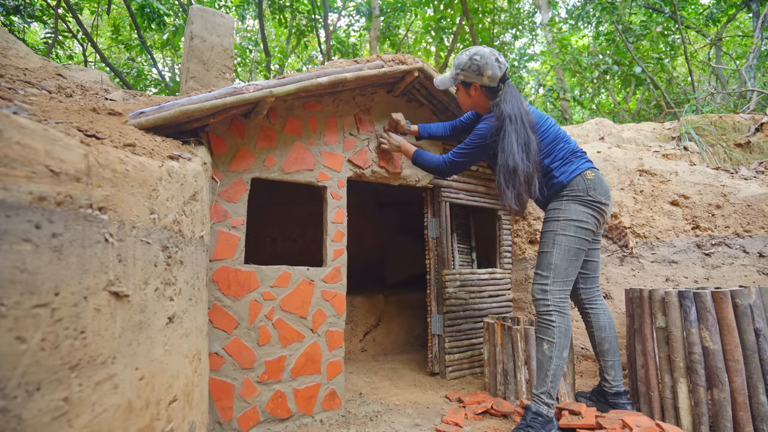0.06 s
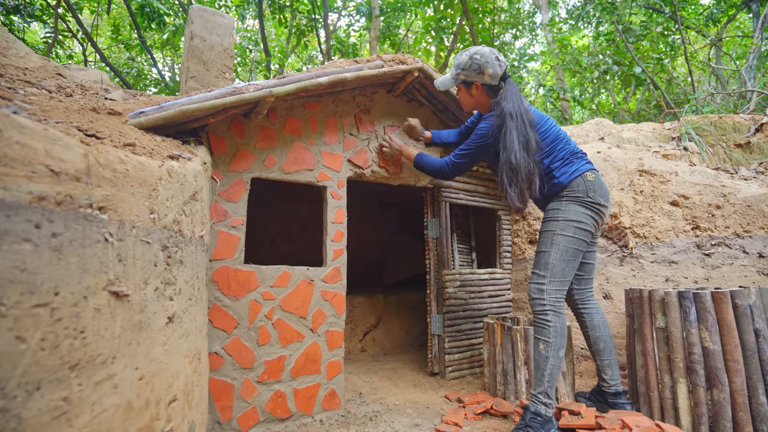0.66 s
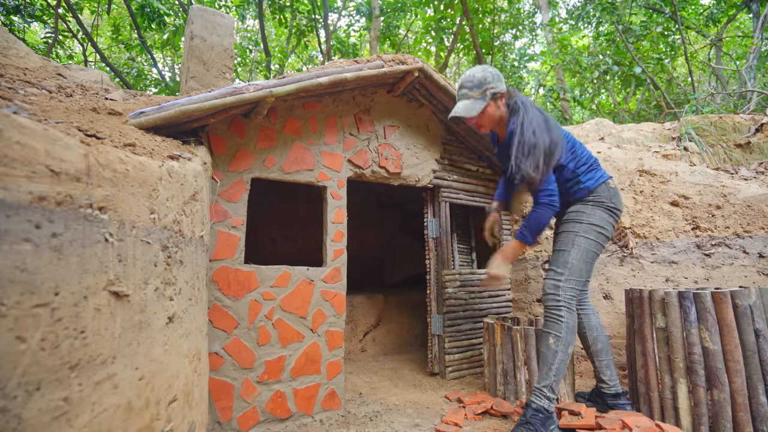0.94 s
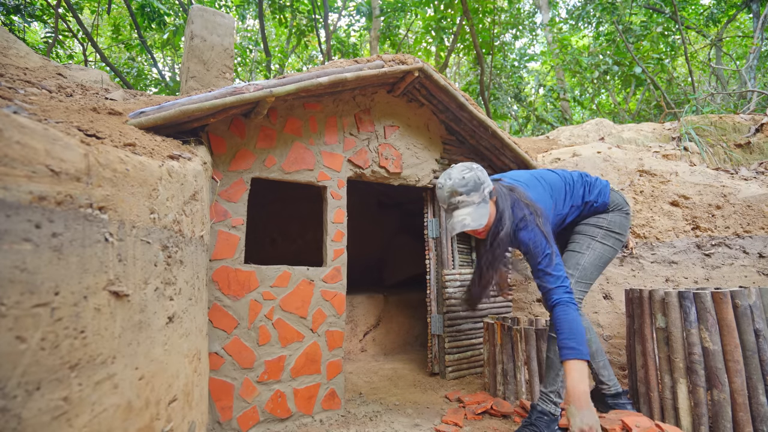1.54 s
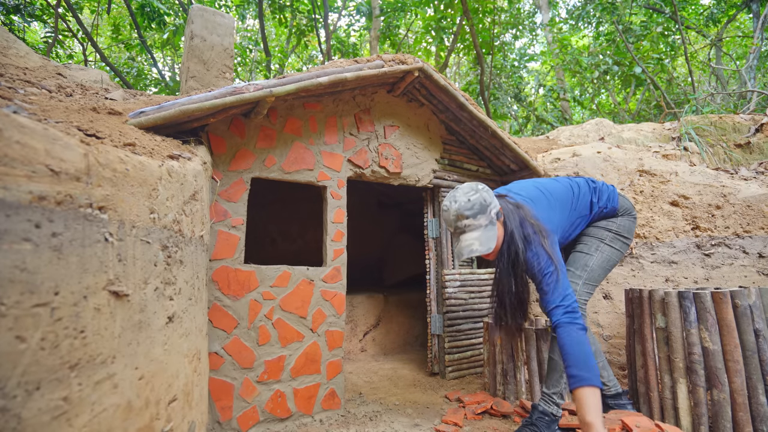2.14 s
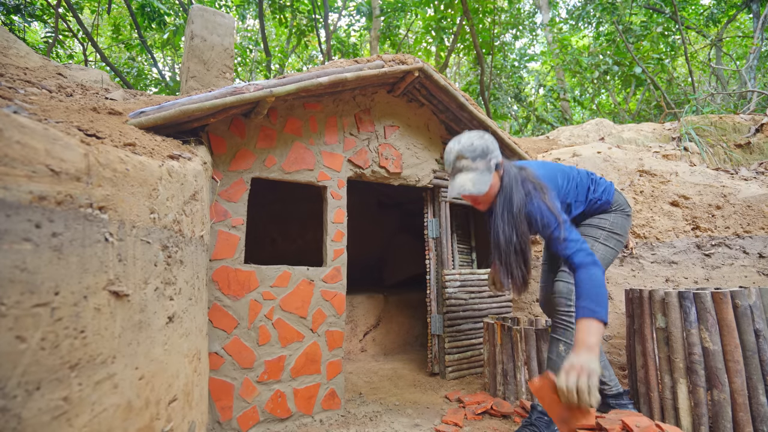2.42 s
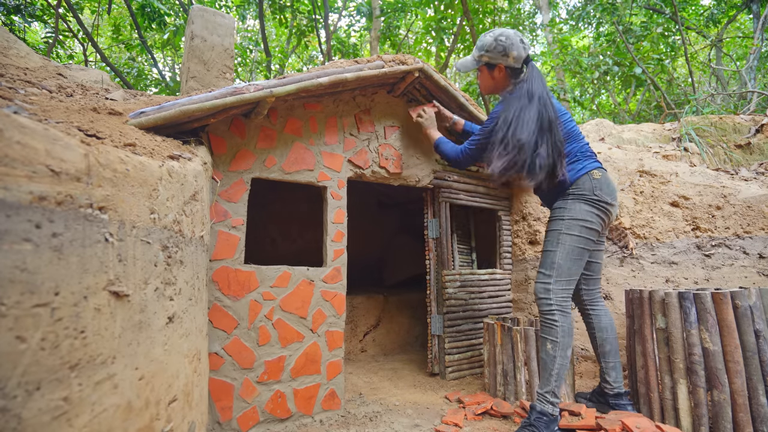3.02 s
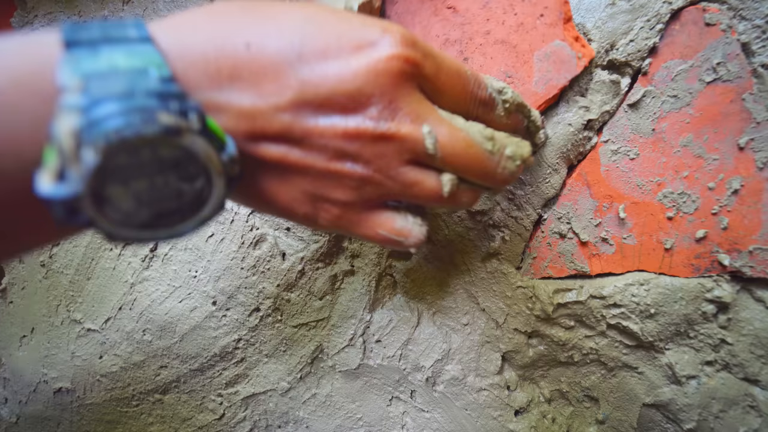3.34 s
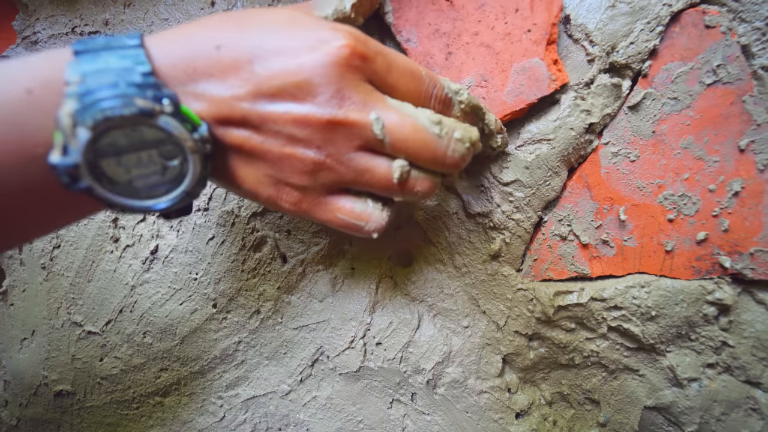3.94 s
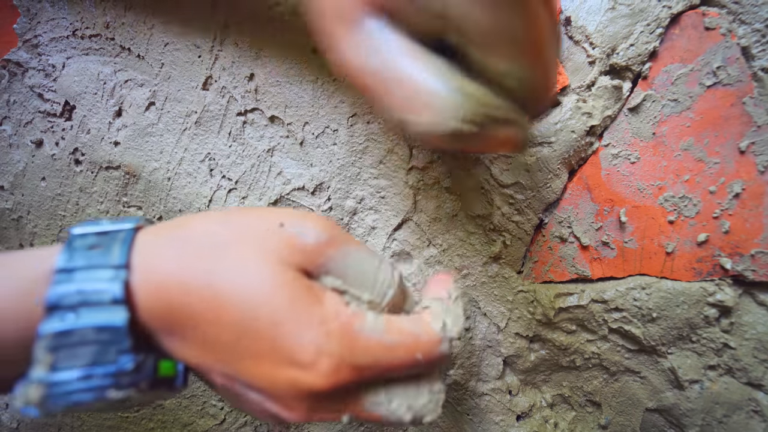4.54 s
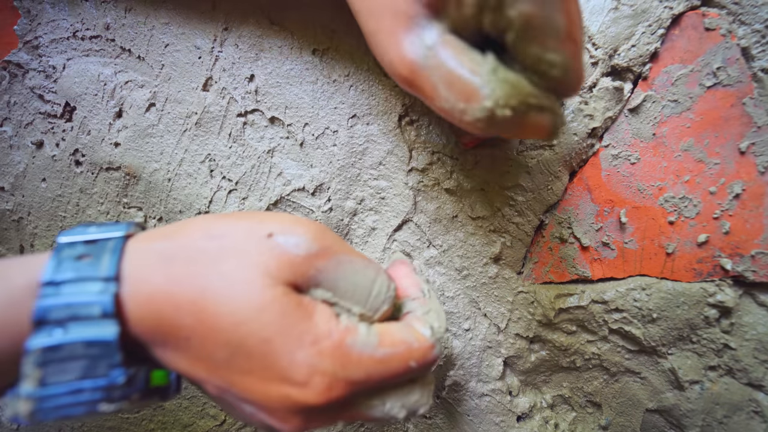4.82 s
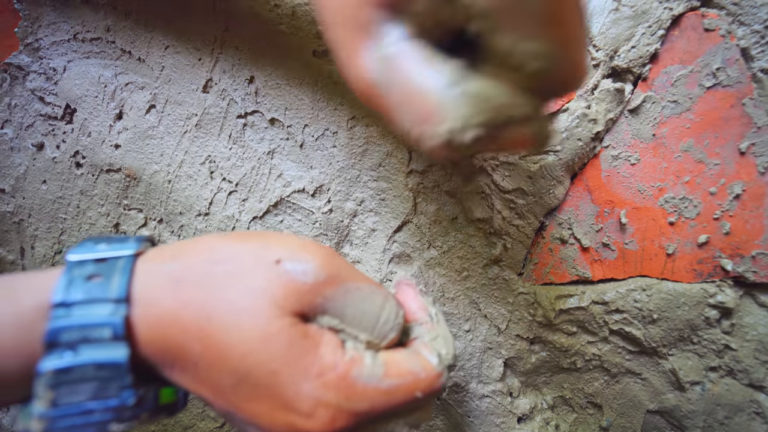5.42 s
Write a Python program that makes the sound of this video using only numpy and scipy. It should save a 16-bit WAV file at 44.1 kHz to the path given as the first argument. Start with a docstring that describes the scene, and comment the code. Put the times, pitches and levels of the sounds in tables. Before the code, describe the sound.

A high cicada drone runs throughout, over a faint hiss of forest leaves. From the start until about 1.3 seconds, tile shards are lightly tapped and rubbed into plaster a few steps away, while birds give short whistles among the trees. From 1.4 seconds a hand rakes through a pile of shards, which grind and clack, growing loudest around 2.5 seconds, when one piece rings briefly as it comes free. Thin birdsong and dry chatter follow, with one faint tap and a rub near 3.1 seconds. At 3.4 seconds the sound moves right up to the wall: the birds stop, the cicadas buzz more strongly, and fingers work wet mud with soft crackles and small pops. From 4.6 to about 5.5 seconds a fist pounds the mud six times, quickly and evenly, each blow a low thump with a sticky slap.

```python
"""Someone tiles a mud hut in a forest, where cicadas drone throughout over faint leaves.
First, while birds whistle among the trees, shards are tapped and rubbed into the plaster.
From 1.4 s a hand rakes a pile: shards grind and clack, and one rings as it comes free.
From 3.4 s, heard close by and without the birds, fingers work the crackling wet mud.
From 4.6 s a fist pounds it six times, each blow exciting the low modes of the wall."""
import sys
import numpy as np
from scipy import signal
from scipy.fft import rfft, irfft, next_fast_len
from scipy.io import wavfile
from scipy.ndimage import map_coordinates

SR = 44100
rng = np.random.default_rng(int(sys.argv[2]) if len(sys.argv) > 2 else 0)


def digitize_waveform(pressure):
    """Quantize a signal to 16-bit integers and store it at the path in sys.argv[1].

    Rows of a 2-D input are taken as channels; values are limited to [-1, 1].
    """
    field = np.atleast_2d(pressure).T
    bounded = np.clip(field, -1, 1)
    quanta = np.round(bounded * 32767).astype(np.int16)
    wavfile.write(sys.argv[1], SR, quanta)


N = 245624
T = np.arange(N) / SR
BRIEF = np.arange(SR // 4) / SR  # time axis of one short event
CLOSE_S = 3.408  # from here on the listener is right at the wall
LIFT_S = 2.4  # the piece leaves the ground, so later knocks thud less

# Spectra. Each row: frequency in Hz, relative spectral density in dB.
LEAF_SPECTRUM = [(40, 2), (105, -1.5), (150, 4), (220, 0), (450, 2), (1100, -4.5), (2200, -7), (4000, -8),
                 (4700, -3), (5400, -16.5), (9000, -12.5), (15500, -9)]
CHORUS_SPECTRUM = [(5200, -24), (6000, -7), (6500, 2.5), (7200, 1), (7900, -10), (9000, -33.5)]  # far cicadas
HISS_SPECTRUM = [(3000, -62), (5500, -68), (6900, 29), (7600, 36), (8200, -14), (11500, 9), (12400, 8),
                 (12800, 28.5), (13100, 18), (15500, 8)]  # near cicadas
CRACK_SPECTRUM = [(500, -29.5), (900, -6), (1700, -2), (3000, 6), (4600, 7), (7000, 3), (10000, -33)]  # a struck shard
THUD_SPECTRUM = [(120, -39.5), (190, -29), (260, 1), (500, -1.5), (800, -4.5), (1400, -7), (3000, -34)]  # what lies below it
EDGE_SPECTRUM = [(4000, -6.5), (7500, 2), (10000, 1), (16000, -17)]  # the bright edge of a contact
CHIP_SPECTRUM = [(4000, -13.5), (7500, -0.5), (11500, 2), (16000, -6)]  # a shard ticking on dry plaster
RUB_SPECTRUM = [(100, -58), (250, 5.5), (900, -3.5), (1800, 3), (4500, 3.5), (8000, -2), (15000, -13)]  # hand on mud and cloth
GRIND_SPECTRUM = [(88, -58.5), (150, -15), (331, 13), (485, 3.5), (764, 8.5), (1070, 0), (1300, 8.5),
                  (1690, 11), (2010, 0), (2550, 9.5), (2780, 1.5), (3410, 5.5), (5000, -15), (6500, -50.5),
                  (11000, -120)]  # shard on shard
GRIT_SPECTRUM = [(1650, -25), (2800, 1), (3380, -14.5), (3670, -1), (4770, 5), (5440, -8), (5930, -1.5),
                 (11400, -11), (14400, -22), (16000, -29.5)]  # fine edges and sand
MUD_SPECTRUM = [(200, -33), (1500, -5), (2800, 9.5), (3500, 6.5), (4700, 10.5), (7000, 8.5), (15000, -2.5)]  # wet mud tearing
SLAP_SPECTRUM = [(200, 4), (400, -1.5), (780, -4), (1400, -8.5), (2600, -8)]  # skin striking mud

# Low air rumble. Each row: time in seconds, level in dB.
RUMBLE_LEVELS = [(0, -69), (.75, -63), (.9, -79), (2, -80), (4.5, -76), (5.57, -72)]
# Slurred bird whistles. Each row: start and length in seconds, held pitch in Hz,
# scoop as a share of pitch, level in dB, tremor as a share of pitch.
BIRD_WHISTLES = [(-.03, 0.064, 2077, -0.0079, -52.5, 0.026), (0.098, 0.0706, 2720, .14, -53, 0.03),
                 (0.259, 0.069, 3310, -0.043, -63.5, 0.046), (0.607, 0.092, 3135, 0.16, -57.5, 0.034),
                 (0.687, 0.1, 2490, -0.15, -48.5, .018), (.83, 0.042, 2637, -.05, -49, 0.028),
                 (1.017, 0.061, 3150, 0.082, -53, 0.024), (1.061, .11, 3016, -.16, -49, 0.0504),
                 (1.243, 0.0575, 4050, 0.119, -54.5, .09), (1.414, .066, 3590, 0.15, -55.5, .03),
                 (1.499, .087, 2560, -0.11, -49, 0.041), (1.824, 0.13, 2810, .14, -50, 0.062)]
# A thin song. Each row: start and length in seconds, first pitch in Hz, sag in Hz/s, level in dB.
SAGGING_NOTES = [(2.722, 0.094, 4536, 1640, -47.5), (2.84, 0.054, 4527, 3000, -54),
                 (2.906, 0.052, 4350, 6500, -50.5), (2.981, 0.18, 4250, 2594, -60),
                 (3.155, .085, 5570, 6970, -52.5), (3.225, 0.11, 5116, 396, -50)]
# A bird's dry three-note bursts. Each row: first peak in seconds, level in dB.
CHATTER_BURSTS = [(2.869, -50.5), (3.081, -49.5), (3.249, -49.5)]
# Shards touching the wall. Each row: start in seconds, level in dB, main ring in Hz.
WALL_TAPS = [(0.0357, -23.5, 3880), (0.203, -35.5, 6800), (0.3177, -36.5, 6900), (0.3656, -39.5, 4640),
             (0.4676, -35.5, 4630), (0.518, -41, 6840), (0.627, -35.5, 3240), (0.6464, -34.5, 3500),
             (0.8157, -36, 4440), (0.8738, -33.5, 2500), (1.0785, -22, 2700), (1.3012, -41, 3430),
             (3.068, -41, 4070)]
# The palm pushing on the hollow wall. Each row: start in seconds, level in dB.
PALM_BUMPS = [(0.317, -52.5), (0.476, -55), (0.628, -55.5), (1.272, -62)]
# Gritty rubs of the hand. Each row: peak time, rise and fall in seconds, level in dB.
HAND_RUBS = [(.49, 0.021, 0.049, -54), (.86, 0.025, 0.12, -61.5), (1.09, 0.032, 0.026, -37.5),
             (1.275, 0.083, 0.083, -53.5), (3.22, 0.074, 0.1, -55.5)]
# Shards knocking in the pile. Each row: start in seconds, level in dB, main ring in Hz.
PILE_CLACKS = [(1.467, -27.5, 5370), (1.511, -29, 2923), (1.558, -30, 2728), (1.620, -24, 4070),
               (1.6347, -24, 4460), (1.709, -24.5, 4670), (1.758, -28, 4760), (1.7845, -22.5, 1680),
               (1.857, -24.5, 2230), (1.8655, -14, 1710), (1.982, -15.5, 1460), (2.039, -11.5, 4900),
               (2.0513, -19, 4640), (2.082, -25.5, 3880), (2.0937, -22.5, 4150), (2.153, -27, 4700),
               (2.171, -21.5, 4350), (2.1845, -19, 4100), (2.225, -22, 1269), (2.256, -22, 5930),
               (2.342, -22, 4770), (2.413, -17, 4360), (2.4344, -15.5, 5630), (2.442, -15.5, 1709),
               (2.492, -17.5, 1460), (2.5072, -13, 2570), (2.5182, -9, 1710), (2.5402, -6.5, 4020),
               (2.5698, -22, 3950), (2.5815, -12, 4700), (2.5954, -14, 1990), (2.603, -8, 2300)]
# The hand searches the pile, then drags a piece out.
# Each row: time in seconds, relative levels of grinding and of grit in dB.
PILE_SEARCH = [(1.435, -62, -51), (1.465, -47, -38), (1.51, -48.5, -51), (1.565, -47, -36),
               (1.65, -47.5, -43), (1.755, -44.5, -45.5), (1.835, -35, -36.5), (1.87, -32.5, -53.5),
               (1.9, -61, -70)]
PILE_DRAG = [(1.975, -69, -55), (1.995, -46.5, -39.5), (2.21, -50, -43), (2.32, -33, -30),
             (2.405, -39.5, -34), (2.44, -30, -29.5), (2.463, -40.5, -38.5), (2.515, -25, -26),
             (2.56, -34.5, -42.5), (2.67, -44, -29.5), (2.756, -57, -50)]
# Modes of the freed shard. Each row: frequency in Hz, relative level in dB, t60 in seconds.
SHARD_MODES = [(1760, -8, .4), (2400, -3, .2), (3420, -3, .9), (4110, -6, .7), (4330, 0, .6),
               (4540, -5, .6), (4740, -6, .7), (5470, -1, .5), (5875, 0, .45), (6920, -3, .5),
               (7610, -9, .4), (8660, -3, .35), (9280, -10, .3), (14100, -20, .3)]
# Blows that set it ringing. Each row: start in seconds, level in dB.
SHARD_STRIKES = [(2.435, -44), (2.542, -37), (2.604, -32)]
# Wet mud squeezed. Each row: peak time, rise and fall in seconds, level in dB, cavity pitch in Hz.
MUD_SQUEEZES = [(3.409, .001, 0.021, -48.5, 2800), (3.472, 0.022, 0.021, -48, 2700),
                (3.653, 0.009, 0.019, -48.5, 4370), (3.79, 0.16, 0.071, -57, 4680),
                (4.028, 0.037, 0.016, -54.5, 4680), (4.124, 0.0075, .03, -57.5, 4500),
                (4.593, 0.042, 0.034, -62.5, 2850), (5.445, 0.0081, 0.0037, -43.5, 2870)]
# Air pockets opening. Each row: start in seconds, level in dB, pitch in Hz, t60 in seconds.
POCKET_SNAPS = [(3.4632, -40, 2870, 0.022), (3.4994, -43.5, 2660, .016), (3.5154, -29.5, 2660, 0.027),
                (3.650, -23, 4590, 0.00784), (3.661, -33, 4390, .009), (3.8661, -22, 7470, 0.0031),
                (3.9968, -32.5, 7000, 0.0014), (4.043, -31, 4770, 0.0061), (4.6411, -13.5, 4540, 0.015),
                (4.8311, -19, 4400, 0.0063), (4.835, -19.5, 3600, 0.0047), (5.2062, -13.5, 8400, 0.0051),
                (5.2063, -19, 6330, 0.0031), (5.2066, -19.5, 3330, 0.0045), (5.543, -29.5, 2940, 0.0076),
                (5.5522, -23.5, 3190, 0.0072)]
# Fist blows. Each row: time in seconds, thump level in dB, slap delay in seconds,
# slap level in dB, peel delay in seconds, peel level in dB.
FIST_BLOWS = [(4.639, -28, .0016, -17, 0.011, -63.5), (4.8295, -25, .003, -29.5, 0.016, -49),
              (5.0061, -28, .0023, -32.5, 0.031, -49.5), (5.2041, -28, 0.0067, -29, .038, -43),
              (5.3695, -26, .002, -22, 0.0177, -44.5), (5.5433, -28, .0008, -13.5, .021, -39)]
# Modes of the mud wall. Each row: frequency in Hz, relative level in dB, t60 in seconds.
WALL_MODES = [(37.1, -11, 0.59), (42.4, -0.5, 0.14), (74, -11.5, 0.13), (138, -9, 0.11)]

RAKE_START_S, RAKE_END_S = PILE_SEARCH[0][0], PILE_DRAG[-1][0]


def amp(db):
    """Decibels to amplitude ratio."""
    return 10 ** (np.asarray(db) / 20)


def unit(x):
    """Normalisation to rms 1."""
    return x / np.sqrt(np.mean(x ** 2) + 1e-20)


def curves(rows):
    """Linear interpolation of each column after the time, one value per sample."""
    times, *columns = np.transpose(rows)
    return [np.interp(T, times, column) for column in columns]


def wobble(rate):
    """Smooth random modulation with rate knots a second."""
    return map_coordinates(rng.standard_normal(int(N * rate / SR) + 4), [T * rate])


def colour(x, points):
    """Spectral shaping by (Hz, dB) points, falling 40 dB in the octave past each end; rms 1."""
    size = next_fast_len(len(x) + 2048)
    bins = np.fft.rfftfreq(size, 1 / SR)
    hz, db = np.transpose(points)
    hz, db = np.r_[hz[0] / 2, hz, hz[-1] * 2], np.r_[db[0] - 40, db, db[-1] - 40]
    gain = amp(np.interp(np.log(bins + 1), np.log(hz), db))
    return unit(irfft(rfft(x, size) * gain, size)[:len(x)])


def noise(points, size=N):
    """Coloured Gaussian noise; rms 1."""
    return colour(rng.standard_normal(size), points)


def band(hz, width_hz, size=N):
    """One resonance under random excitation; rms 1."""
    detuning = (np.fft.rfftfreq(size, 1 / SR) - hz) / width_hz
    return unit(irfft(rfft(rng.standard_normal(size)) / (1 + detuning ** 2), size))


def grains(points, rate, spread_db):
    """Shot noise of tiny contacts of very unequal size, about rate a second; rms 1."""
    impulses = (rng.random(N) < rate / SR) * rng.choice([-1, 1], N)
    sizes = amp(spread_db * np.clip(rng.standard_normal(N), -2, 2))
    return colour(impulses * sizes, points)


def fade(t60):
    """Exponential decay by 60 dB in t60 seconds."""
    return 1000. ** (-BRIEF / t60)


def mode(hz, t60):
    """Free vibration of a damped oscillator."""
    return np.sin(2 * np.pi * hz * BRIEF) * fade(t60)


def add(track, s, sound):
    """Superposition of a sound on a track at s seconds."""
    start = round(s * SR)
    part = sound[max(-start, 0):max(N - start, 0)]
    track[max(start, 0):][:len(part)] += part


def echo(x, t60, wet_db):
    """Reverberation: the direct sound plus a diffuse, decaying tail."""
    t = np.arange(SR) / SR
    tail = rng.standard_normal(SR) * 1000. ** (-t / t60) * (t > .004)
    return x + amp(wet_db) * signal.fftconvolve(x, tail / np.linalg.norm(tail))[:N]


def strokes(rows):
    """Envelope of hand pressure that swells and lets go exponentially."""
    return sum(amp(db) * np.exp(-np.maximum((s - T) / rise, (T - s) / fall))
               for s, rise, fall, db in rows)


def air():
    """Broadband noise: leaves hiss faintly over a low rumble."""
    rumble_db, = curves(RUMBLE_LEVELS)
    leaves = amp(-63.5) * noise(LEAF_SPECTRUM)
    return leaves + amp(rumble_db) * noise([(22, -6), (37, 0), (52, -14), (80, -36)])


def narrowband(hz, rate):
    """Random modulation of amplitude and phase spreads a carrier into a narrow band; rms 1."""
    modulation = wobble(rate) + 1j * wobble(rate)
    carrier = np.exp(2j * np.pi * np.cumsum(hz * np.ones(N)) / SR)
    return unit(np.real(modulation * carrier))


def cicadas():
    """Frequency modulation: over a far chorus, one near insect swings in pitch and another throbs."""
    cycle_s, throbs_per_s = .457, 6.75
    swing = np.cos(2 * np.pi * (T - 4.507) / cycle_s)
    buzz = amp(-51.5 + 1.1 * swing) * narrowband(7375 + 70 * swing, rate=140)
    # a purer note sounds at the bottom of each swing
    low_note = amp(-52.5) * narrowband(7240, rate=30) * np.maximum(-swing, 0)
    turn = (throbs_per_s * (T - 4.275) + .5) % 1 - .5  # place in each falling pulse, 0 at its peak
    throb = amp(-63 + 7 * np.cos(2 * np.pi * turn)) * narrowband(7030 - 700 * turn, rate=350)
    near = buzz + low_note + throb + amp(-59) * noise(HISS_SPECTRUM)
    chorus = amp(-60 + 1.7 * wobble(15)) * noise(CHORUS_SPECTRUM)
    low_drone = amp(-71.5) * band(4600, 169)  # a lower insect carries across the yard
    return chorus + np.where(T > CLOSE_S, near, low_drone)


def bird_note(length, pitch, tremor):
    """A frequency-modulated tone under a half-sine swell; pitch maps time in the note to Hz."""
    t = np.arange(int(length * SR)) / SR
    hz = pitch(t) * (1 + tremor * wobble(350)[:len(t)])
    return np.sin(np.pi * t / length) * np.sin(2 * np.pi * np.cumsum(hz) / SR)


def birds():
    """Scattering by the trees carries most of the whistles, song and pips; the chatter is drier."""
    song = np.zeros(N)
    for s, length, hz, scoop, db, tremor in BIRD_WHISTLES:
        glide = lambda t: hz * (1 + scoop * np.exp(-t / (.3 * length)))
        add(song, s, amp(db) * bird_note(length, glide, tremor))
    for s, length, hz, sag, db in SAGGING_NOTES:
        add(song, s, amp(db) * bird_note(length, lambda t: hz - sag * t, tremor=.0091))
    for k in range(3):  # low pips
        add(song, .8 + k * .064, amp(-58) * bird_note(.02, lambda t: 1463, tremor=.03))
    bursts = sum(amp(db) * np.exp(-((T - s - k * .033) / .0087) ** 2)
                 for s, db in CHATTER_BURSTS for k in range(3))
    chatter = bursts * band(2490, 430)
    return (echo(song, t60=.43, wet_db=8) + echo(chatter, t60=.11, wet_db=-6.5)) * (T < CLOSE_S)


def facets(depth_db):
    """Shape sets resonance: each shard has its own random peaks and dips, as (Hz, dB) points."""
    hz = np.linspace(300, 16000, 48)
    return np.c_[hz, depth_db * np.clip(rng.standard_normal(len(hz)), -1.5, 1.5)]


def knocks(rows, t60, edge_spectrum, ring_db, crack_db, thud_db, edge_db, ring_width_hz, attack_s):
    """Damped impacts of tile: a short ring, a crack, a bright edge and the thud of what lies below."""
    out, size = np.zeros(N), len(BRIEF)
    onset = 1 - np.exp(-BRIEF / attack_s)
    for s, db, hz in rows:
        shape = facets(depth_db=5)
        ring = amp(ring_db) * band(hz, ring_width_hz, size)
        crack = amp(crack_db) * colour(noise(CRACK_SPECTRUM, size), shape)
        dulling_db = .34 * (db + 20.5)  # harder knocks have a smaller share of edge
        edge = amp(edge_db - dulling_db) * colour(noise(edge_spectrum, size), shape) * fade(.49 * t60)
        thud = amp(thud_db(s)) * noise(THUD_SPECTRUM, size) * fade(1.82 * t60)
        add(out, s, amp(db) * ((ring + crack) * fade(t60) + edge + thud) * onset)
    return out


def wall_work():
    """Impact and friction: pieces are tapped and rubbed into the plaster, a few steps away."""
    taps = knocks(WALL_TAPS, t60=.045, edge_spectrum=CHIP_SPECTRUM, ring_db=-18, crack_db=-9.5,
                  thud_db=lambda s: -26.5, edge_db=-12, ring_width_hz=260, attack_s=.0011)
    for s, db in PALM_BUMPS:
        add(taps, s, amp(db) * band(193, 42, len(BRIEF)) * fade(.085))
    return taps + strokes(HAND_RUBS) * grains(RUB_SPECTRUM, rate=12000, spread_db=8)


def chinks(points, low_hz, high_hz, t60, spread_db, count):
    """Random impacts: each catching corner rings at its own pitch; rms 1 during the raking."""
    when, pitch, phase = rng.random((count, 3)).T[:, :, None]
    sizes = amp(spread_db * np.clip(rng.standard_normal((count, 1)), -2, 1.7))
    t = BRIEF[:700]
    hz = low_hz + pitch * (high_hz - low_hz)
    rings = sizes * np.sin(2 * np.pi * (hz * t + phase)) * 1000. ** (-t / t60)
    span_s = RAKE_END_S - RAKE_START_S
    index = ((RAKE_START_S + when * span_s) * SR).astype(int) + np.arange(len(t))
    summed = np.bincount(index.ravel(), rings.ravel(), N)
    return colour(summed, points) * np.sqrt(span_s * SR / N)


def pile():
    """Stick-slip friction and impact: shards grind and clack as one is raked out."""
    grind_db, grit_db = curves(PILE_SEARCH + PILE_DRAG)
    contact = (T > RAKE_START_S) & (T < RAKE_END_S)
    catch = amp(.98 * wobble(70))  # rough edges catch and slip
    corners = chinks(GRIND_SPECTRUM, low_hz=200, high_hz=4800, t60=.022, spread_db=5.5, count=1700)
    edges = chinks(GRIT_SPECTRUM, low_hz=3000, high_hz=15500, t60=.012, spread_db=6, count=3400)
    sand = grains(GRIT_SPECTRUM, rate=9000, spread_db=6)
    scrape = amp(grind_db - 2) * corners + amp(grit_db - 5) * unit(edges + .48 * sand)
    ground_db = lambda s: -17.5 if s < LIFT_S else -25
    clacks = knocks(PILE_CLACKS, t60=.046, edge_spectrum=EDGE_SPECTRUM, ring_db=-7.5, crack_db=-7.5,
                    thud_db=ground_db, edge_db=-5.5, ring_width_hz=220, attack_s=.00081)
    no_bass = signal.butter(2, 150, "highpass", fs=SR)  # the pile's sounds carry little below 150 Hz
    return signal.lfilter(*no_bass, contact * catch * scrape + clacks)


def shard():
    """Free vibration: the freed piece rings in its modes until the closing hand damps it."""
    out = np.zeros(N)
    for s, db in SHARD_STRIKES:
        for hz, mode_db, t60 in SHARD_MODES:
            drift = np.cumsum(rng.normal(0, .03, len(BRIEF)))
            phase = 2 * np.pi * hz * BRIEF + drift + rng.uniform(0, 2 * np.pi)
            add(out, s, amp(db + mode_db + rng.normal(0, 2.9)) * np.sin(phase) * fade(t60))
    return out * np.interp(T, [2.735, 2.755], [1, 0])


def mud():
    """Cavity resonance: hollows colour the crackle of wet plaster, and air pockets snap open."""
    out = np.zeros(N)
    crackle = unit(grains(MUD_SPECTRUM, rate=2500, spread_db=8.5) + .57 * noise(MUD_SPECTRUM))
    hollow = lambda hz: unit(signal.lfilter(*signal.iirpeak(hz, Q=8, fs=SR), crackle))
    for s, rise, fall, db, hz in MUD_SQUEEZES:
        out += strokes([(s, rise, fall, db)]) * (crackle + amp(-4) * hollow(hz))
    dent = crackle + amp(-12.5) * hollow(2650)  # the hollow left by the fist
    for s, *_, peel_delay, peel_db in FIST_BLOWS:
        squelch = (s, .0012, .011, -42.5)  # mud gives way
        peel = (s + peel_delay, .004, .015, peel_db)  # skin comes unstuck
        out += dent * strokes([squelch, peel])
    for s, db, hz, t60 in POCKET_SNAPS:
        tear = amp(-4.5) * noise(MUD_SPECTRUM, len(BRIEF)) * fade(1.09 * t60)
        tick = amp(-8) * noise(EDGE_SPECTRUM, len(BRIEF)) * fade(.0027)  # the wet film breaks
        add(out, s, amp(db) * (mode(hz, t60) + tear + tick))
    # single grains tick under the fingers
    sand = grains([(4000, -10), (9000, 0), (15500, -2)], rate=200, spread_db=5)
    sand_db = np.interp(T, [3.4, 3.85, 4.3, 5.5], [-70, -60, -72, -67.5])
    return out + sand * amp(sand_db) * (T > CLOSE_S)


def fist():
    """Impulse response: each soft blow sets the wall's modes swaying as the skin slaps the mud."""
    pushes, slaps = np.zeros(N), np.zeros(N)
    for s, db, slap_delay, slap_db, *_ in FIST_BLOWS:
        push = np.exp(-.5 * ((T - s + .00014) / .0014) ** 2)
        pushes += amp(db) * push / push.sum()
        # a flatter, louder slap traps more air and sounds lower: an octave per 17.5 dB
        slap_hz = 530 * 2 ** (-(slap_db + 11.5) / 17.5)
        slap = mode(slap_hz, t60=.0038) + .089 * noise(SLAP_SPECTRUM, len(BRIEF)) * fade(.065)
        add(slaps, s + slap_delay - .0005, amp(slap_db) * slap)
        plaster_coat = mode(208, t60=.134) + .41 * mode(290, t60=.025)
        add(slaps, s, amp(db - 18) * plaster_coat)
    sway = sum(amp(db) * np.cos(2 * np.pi * hz * T) * 1000. ** (-T / t60) for hz, db, t60 in WALL_MODES)
    return signal.fftconvolve(pushes, sway)[:N] + slaps


def scene():
    """Superposition: yard work briefly reflected by earth banks, close handwork and the forest."""
    yard = echo(pile() + shard() + wall_work(), t60=.088, wet_db=-10)
    return (yard + mud() + fist() + birds() + cicadas() + air())[None]


def record(dry):
    """Band limiting: an ideal low-pass filter keeps nothing above 15.9 kHz."""
    size = next_fast_len(N + 4096)
    passband = np.fft.rfftfreq(size, 1 / SR) < 15900
    return irfft(rfft(dry, size) * passband, size)[:, :N]


dry = scene()
out = record(dry)
digitize_waveform(out)
```